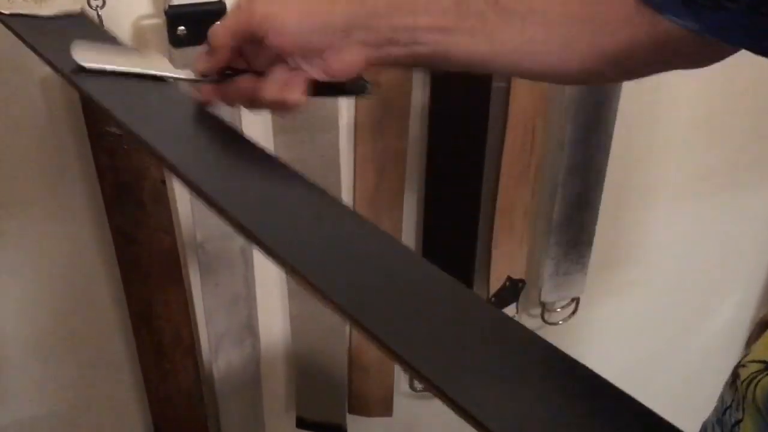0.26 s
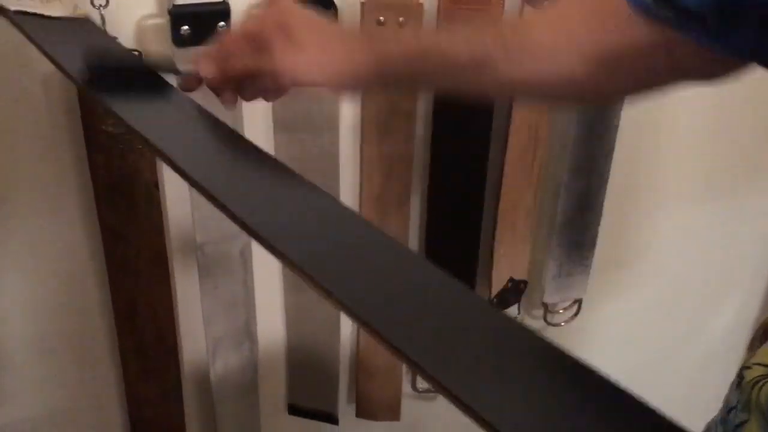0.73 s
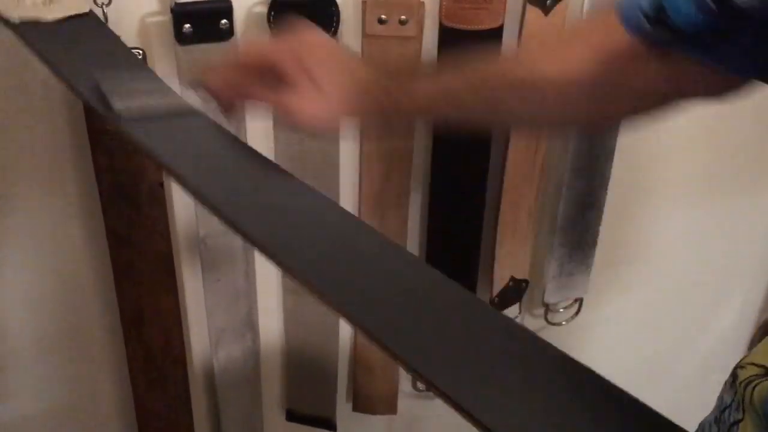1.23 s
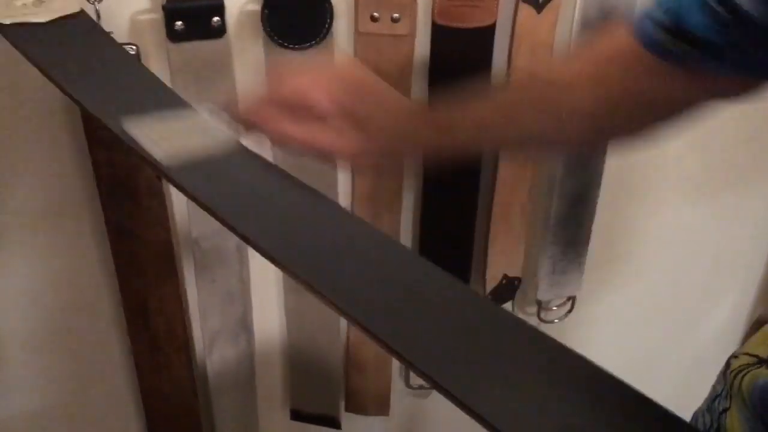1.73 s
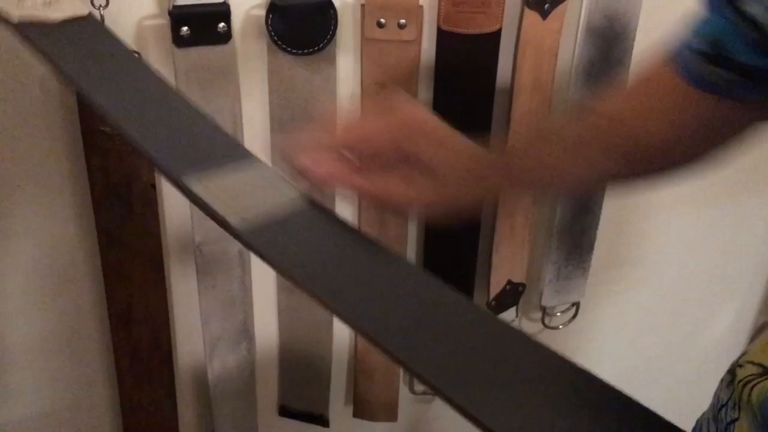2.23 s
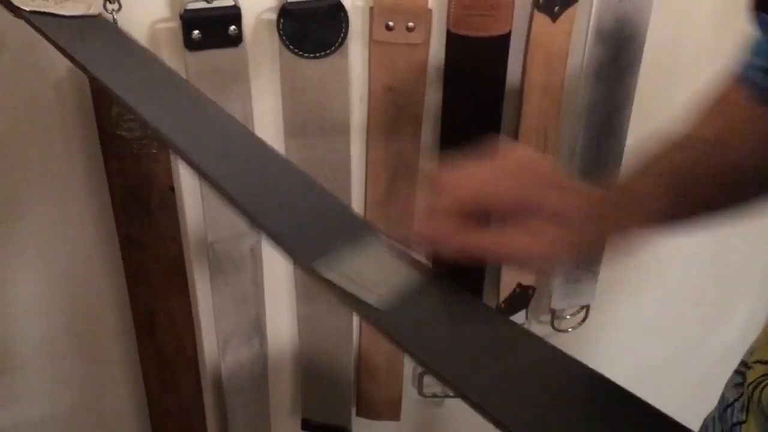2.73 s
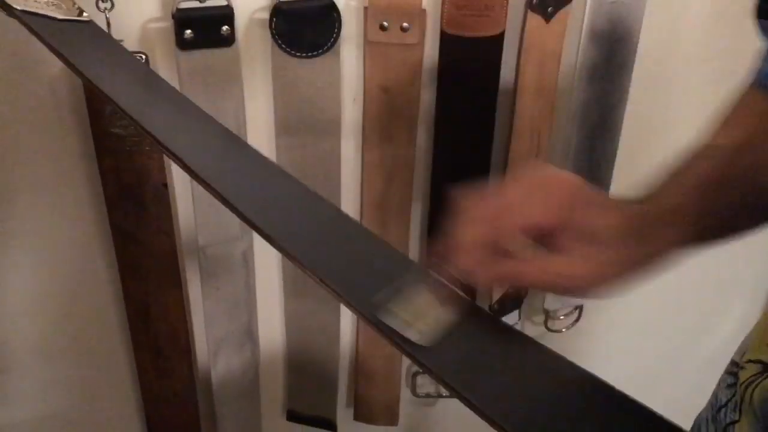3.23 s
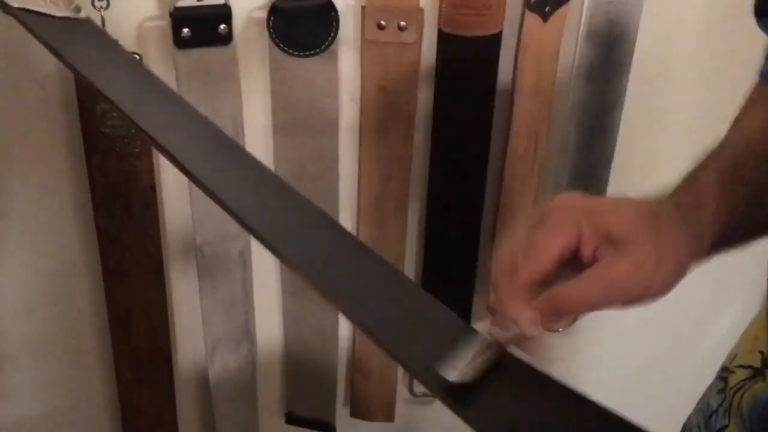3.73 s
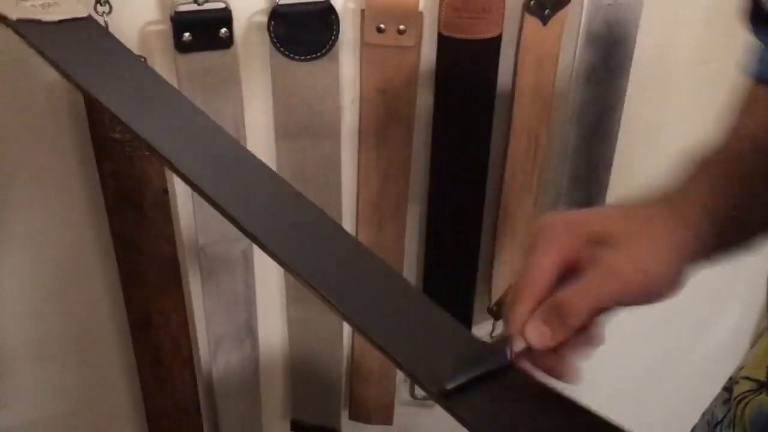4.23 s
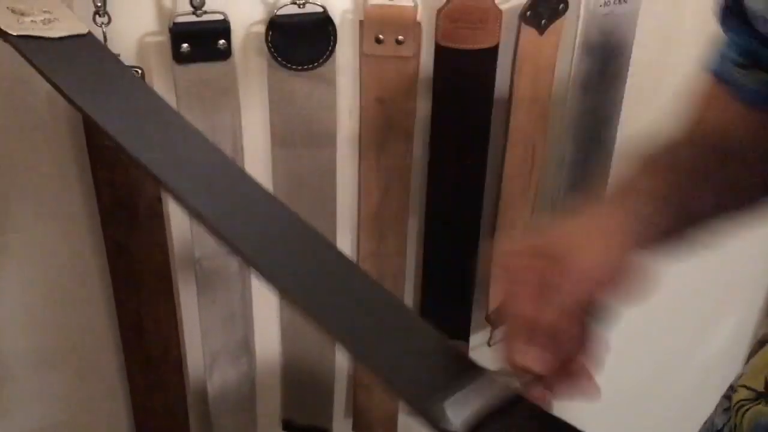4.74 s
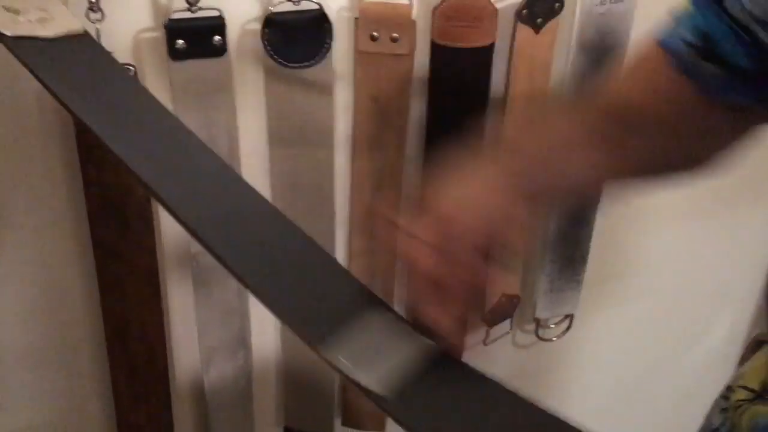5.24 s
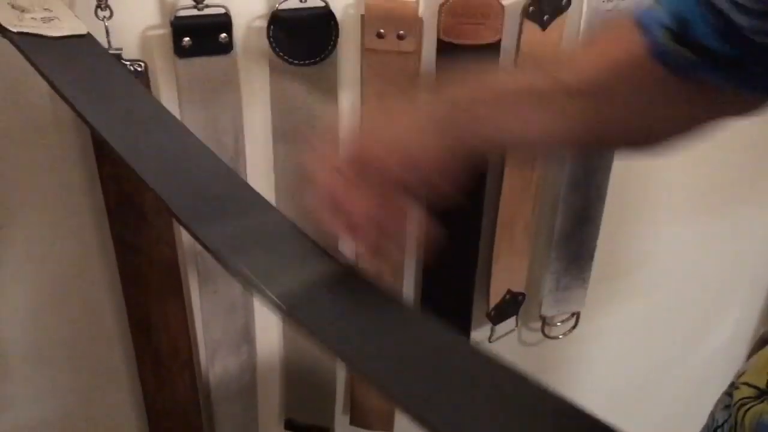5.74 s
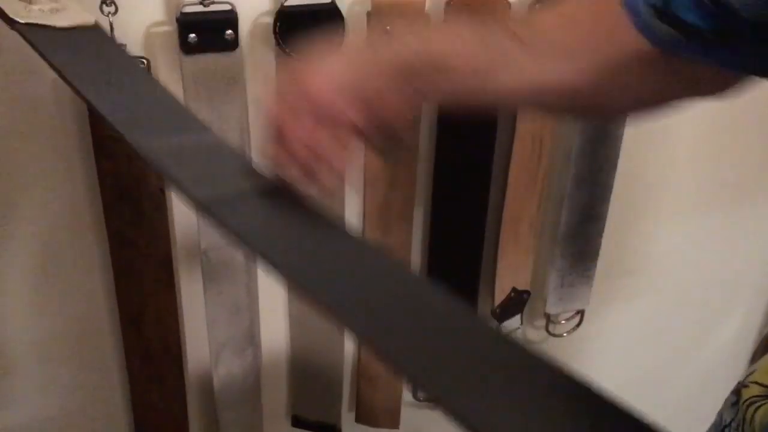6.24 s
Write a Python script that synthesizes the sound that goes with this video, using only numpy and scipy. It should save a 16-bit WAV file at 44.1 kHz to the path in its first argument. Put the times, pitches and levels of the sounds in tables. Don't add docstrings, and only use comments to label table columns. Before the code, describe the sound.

A thin steel blade rubs leather in steady alternating strokes without stopping: touch, airy high hiss, crisp braking scrape, quick flip, then back again. Some return strokes rasp more roughly. Light clicks mark a few landings, the strap softly thuds twice, and the freed blade pings faintly. One close microphone hears it dry, with little room echo, above a quiet, low ventilation drone.

```python
import sys
import numpy as np
from scipy import signal
from scipy.fft import rfft, irfft
from scipy.io import wavfile
from scipy.ndimage import uniform_filter1d, map_coordinates

SR = 44100
rng = np.random.default_rng(int(sys.argv[2]) if len(sys.argv) > 2 else 0)


def int16_out(signal):
    q = np.round(np.clip(np.atleast_2d(signal).T, -1, 1) * 32767)
    wavfile.write(sys.argv[1], SR, q.astype(np.int16))


def invert_db(x):
    u = np.asarray(x, float) / 20
    return 10 ** u


N = 285768


def stropping():
    drive = slips(per_s=16000, spread_db=2.2, clump_db=.9, patchy_db=1.4, streak_db=2.1)
    return blade_and_leather(drive) + edge_sizzle(drive) + rough_grain(drive)


def slips(per_s, spread_db, clump_db, patchy_db, streak_db):
    sign = rng.choice([-1., 1.], N)
    size = sign * invert_db(spread_db * np.minimum(rng.exponential(1, N), 3.6))
    happens = rng.random(N) < per_s / SR
    train = size * happens * invert_db(clump_db * wander(260))
    z = signal.stft(train, nperseg=512, noverlap=384)[2]
    a, b = rng.standard_normal((z.shape[1], z.shape[0], 2)).T
    patches = uniform_filter1d(uniform_filter1d(a, size=9, axis=0), size=9, axis=1)
    streaks = uniform_filter1d(uniform_filter1d(b, size=2, axis=0), size=12, axis=1)
    less_up_high = np.linspace(1.9, .4, len(z))[:, None]
    z = z * invert_db(patchy_db * evened(patches) * less_up_high + streak_db * evened(streaks))
    return signal.istft(z, nperseg=512, noverlap=384)[1][:N]


# touch_s, settling_s, lift_s, landing_db, braking_db
AWAY = [(0.078, 0.015, 0.252, -42.4, -34.6), (0.61, 0.004, 0.776, -44.4, -37.0),
        (1.187, -0.001, 1.313, -47.3, -34.2), (1.672, 0.027, 1.841, -44.2, -34.3),
        (2.234, 0.006, 2.375, -43.9, -33.7), (2.757, 0.016, 2.925, -44.6, -34.7),
        (3.301, 0.016, 3.467, -49.6, -34.4), (3.835, 0.016, 3.998, -44.1, -35.3),
        (4.393, 0.005, 4.526, -44.1, -33.1), (4.904, 0.014, 5.067, -45.1, -32.1),
        (5.437, 0.04, 5.614, -45.0, -34.4), (5.98, 0.011, 6.143, -46.4, -35.8)]
# touch_s, settling_s, lift_s, landing_db, braking_db
BACK = [(-0.15, 0.01, -0.006, -43.0, -35.2), (0.371, 0.018, 0.53, -44.1, -37.6),
        (0.92, 0.011, 1.063, -38.0, -40.1), (1.443, 0.016, 1.604, -42.2, -38.4),
        (2.006, 0.007, 2.126, -41.5, -38.6), (2.521, 0.017, 2.671, -38.3, -39.4),
        (3.039, 0.021, 3.221, -46.0, -39.8), (3.598, 0.013, 3.754, -39.6, -39.4),
        (4.143, 0.007, 4.277, -41.6, -38.4), (4.658, 0.02, 4.815, -41.6, -36.8),
        (5.21, 0.011, 5.36, -40.8, -38.7), (5.751, 0.008, 5.897, -41.9, -37.5),
        (6.284, 0.009, 6.431, -39.8, -40.0)]
# bite_s, fastest_s, slackens_s, speed_db, speed_left_db
AWAY_EDGE = [(0.132, 0.173, 0.225, -27.4, -25.9), (0.646, 0.706, 0.748, -24.7, -35.3),
             (1.201, 1.22, 1.283, -23.5, -30.1), (1.727, 1.762, 1.803, -23.1, -29.0),
             (2.278, 2.308, 2.343, -24.0, -31.4), (2.831, 2.843, 2.898, -23.7, -28.7),
             (3.343, 3.385, 3.439, -24.8, -30.5), (3.898, 3.919, 3.968, -20.8, -27.0),
             (4.431, 4.458, 4.496, -19.0, -28.2), (4.964, 4.988, 5.031, -17.5, -27.5),
             (5.51, 5.54, 5.571, -23.1, -26.6), (6.031, 6.058, 6.101, -20.2, -25.1)]
# bite_s, fastest_s, slackens_s, speed_db, speed_left_db
BACK_EDGE = [(-0.12, -0.09, -0.05, -24.0, -30.1), (0.425, 0.427, 0.482, -24.2, -25.4),
             (0.964, 0.976, 1.033, -19.3, -35.9), (1.493, 1.517, 1.557, -22.1, -27.9),
             (2.036, 2.063, 2.082, -23.2, -26.8), (2.579, 2.595, 2.625, -25.9, -26.3),
             (3.111, 3.123, 3.176, -18.6, -31.5), (3.653, 3.718, 3.725, -23.9, -32.3),
             (4.178, 4.194, 4.238, -24.2, -26.3), (4.711, 4.729, 4.778, -20.4, -25.4),
             (5.265, 5.286, 5.326, -20.1, -28.3), (5.793, 5.811, 5.86, -19.3, -32.8),
             (6.329, 6.357, 6.39, -27.1, -23.5)]
# upper_blade_db, lower_blade_db, leather_db
AWAY_VOICE = dict(touch=(-35, -23, -4), land=(1.5, -.2, .9), fast=(-33.3, -40, -46.6),
              slack=(-35.2, -42.5, -47.5), brake=(-7.4, -.7, -7.6), leave=(-7.7, -4.8, -9.4),
              gone=(-66.7, -67.5, -55.7))
# upper_blade_db, lower_blade_db, leather_db
BACK_VOICE = dict(touch=(-13.2, -15.9, -7.5), land=(.2, 1.3, -1.4), fast=(-33.6, -38.4, -47.7),
              slack=(-33.4, -39.7, -44), brake=(-5.1, -1.8, -1.2), leave=(-16.8, -12.5, -10.4),
              gone=(-71.4, -64.2, -65.1))
# start_s, length_s, level_db
GRAZE = (2.205, .027, -47)
# pitch_hz, level_db (per Hz)
BLADE_HIGH = [(6500, -38), (7700, -8), (8600, -3), (9600, 0), (10500, -6), (12000, -43)]
# pitch_hz, level_db (per Hz)
BLADE_LOW = [(4000, -72), (4900, -12), (5600, -4), (6000, 1), (7200, 2.5), (7700, -8), (9000, -32)]
# pitch_hz, level_db (per Hz)
LEATHER = [(600, -16), (1300, -10), (1900, -9), (2400, -1.5), (2800, -2), (3200, 1), (3700, -2), (4300, -1),
           (4900, -3.5), (6000, -17.5)]
# pitch_hz, level_db (per Hz)
SIZZLE = [(9000, -30), (10300, 1), (11400, 11.5), (13000, 11.5), (15000, 11.5), (17500, 6.5)]


def blade_and_leather(drive):
    high = coloured(drive, BLADE_HIGH) + invert_db(-2.5) * coloured(drive, SIZZLE)
    low, leather = coloured(drive, BLADE_LOW), coloured(drive, LEATHER)
    start, length, db = GRAZE
    touches = [[(start, db - 14, db - 11, db + 2.5),
                (start + .4 * length, db - 5, db - 5.5, db + 2.5),
                (start + length, db - 13, db - 7, db - 6)]]
    for strokes, edges, voice in ((AWAY, AWAY_EDGE, AWAY_VOICE), (BACK, BACK_EDGE, BACK_VOICE)):
        touches += [stages(stroke, edge, voice) for stroke, edge in zip(strokes, edges)]
    out = np.zeros(N)
    for rows in touches:
        now, gains = contact(rows, rise_s=0.0042, fade_db_per_s=500)
        gains[2] = uniform_filter1d(gains[2], size=500, mode="constant")
        for gain, sound in zip(gains, (high, low, leather)):
            out[now] += gain * sound[now]
    return out


# upper_blade, lower_blade, leather (dB per dB)
FOLLOW = (.13, .28, .19)


def stages(stroke, edge, voice):
    usual_speed_db, usual_left_db = -23, -29
    leave_s, release_s = .012, .043
    touch, settle, lift, land_db, brake_db = stroke
    fast, slack, speed_db, left_db = edge[1:]
    control = dict(touch=land_db, land=land_db,
                   fast=np.multiply(FOLLOW, speed_db - usual_speed_db),
                   slack=np.multiply(FOLLOW, left_db - usual_left_db),
                   brake=brake_db, leave=brake_db, gone=0)
    times = (touch, touch + abs(settle), fast, slack, lift, lift + leave_s, lift + release_s)
    return [(s, *np.add(voice[name], control[name])) for s, name in zip(times, voice)]


# approach_s, approach_db, bite_db, dying_db_per_s
AWAY_BITE = (.015, -42.4, -27.2, 775)
# approach_s, approach_db, bite_db, dying_db_per_s
BACK_BITE = (.028, -40.1, -24.8, 750)


def edge_sizzle(drive):
    sizzle = coloured(drive, SIZZLE)
    dying_s = .04
    out = np.zeros(N)
    for edges, rule in ((AWAY_EDGE, AWAY_BITE), (BACK_EDGE, BACK_BITE)):
        approach_s, approach_db, bite_db, dying_db_per_s = rule
        for bite, fast, slack, speed_db, left_db in edges:
            rows = [(bite - approach_s, approach_db), (bite, bite_db), (fast, speed_db), (slack, left_db),
                    (slack + dying_s, left_db - dying_db_per_s * dying_s)]
            now, gains = contact(rows, rise_s=0.0036, fade_db_per_s=900)
            out[now] += gains[0] * sizzle[now]
    return out


# start_s, level_db, length_s
BITES = [(0.41, -20, .04), (0.965, -20, 0.031), (2.03, -20, .035), (3.099, -18, 0.036), (4.178, -17, .025),
         (4.716, -16, 0.024), (5.258, -21, 0.043), (5.79, -18, 0.031)]
# pitch_hz, level_db (per Hz)
RASP = [(5300, -60), (5900, -8), (7300, -1), (8000, -21), (11500, -23), (13500, -5), (15000, 10),
        (17500, 4)]


def rough_grain(drive):
    rasp = coloured(drive, RASP)
    out = np.zeros(N)
    for start, db, length in BITES:
        now, gains = contact([(start, db), (start + length, db - 6.0)], rise_s=0.007, fade_db_per_s=2500)
        out[now] += gains[0] * rasp[now]
    return out


def contact(rows, rise_s, fade_db_per_s):
    s, *levels_db = np.transpose(rows)
    now = slice(max(int(s[0] * SR), 0), int(s[-1] * SR) + 2000)
    t = np.arange(N)[now] / SR
    rise = np.clip((t - s[0]) / rise_s, 0, 1)
    ramp = rise * invert_db(-fade_db_per_s * np.maximum(t - s[-1], 0))
    return now, [ramp * invert_db(np.interp(t, s, db)) for db in levels_db]


# start_s, peak_db, knock_hz, tick_db (steel against the knock)
LANDINGS = [
    (1.1875, -27, 2150, -10),
    (1.4002, -36.5, 1340, -25),
    (2.0187, -30, 2160, 0),
    (3.328, -38, 1500, 8),
    (4.153, -29.5, 2000, -4),
    (5.763, -35, 2460, 0),
]


def landings():
    out, t = np.zeros(N + 6000), np.arange(6000) / SR
    for start, db, hz, tick_db in LANDINGS:
        knock = np.sin(2 * np.pi * hz * t) * t / 0.00076 * np.exp(1 - t / 0.00042)
        knock += invert_db(-2) * np.roll(knock, round(0.0031 * SR))
        tick = invert_db(tick_db) * rng.standard_normal(6000) * invert_db(-60 * t / 0.0065)
        out[round(start * SR):][:6000] += invert_db(db) * (knock + tick)
    return out[:N]


# start_s, peak_db, pitch_hz, fade_s (to -60 dB)
RINGS = [
    (3.196, -40, 9950, .09),
    (3.203, -41, 8850, .12),
    (3.222, -45, 2500, .11),
    (6.126, -42, 3130, .05),
    (1.07, -46, 9000, .06),
    (.325, -46, 9300, .015),
]


def blade_rings():
    out, t = np.zeros(N + 6000), np.arange(6000) / SR
    for start, db, hz, fade_s in RINGS:
        ring = invert_db(db - 60 * t / fade_s) * np.sin(2 * np.pi * hz * t)
        out[round(start * SR):][:6000] += ring * np.minimum(t / 0.0029, 1)
    return out[:N]


# start_s, peak_db, pitch_hz
THUMPS = [
    (.348, -28, 138),
    (3.636, -26.5, 85.5),
]


def hook_tugs():
    out, t = np.zeros(N + 6000), np.arange(6000) / SR
    for start, db, hz in THUMPS:
        out[round(start * SR):][:6000] += invert_db(db) * np.sin(2 * np.pi * hz * t) * t / .007 * np.exp(1 - t / .007)
    return out[:N]


# middle_s, rustle_db
FLIPS = [(.07, -60), (.36, -60), (.59, -63), (.9, -64), (1.16, -67), (1.42, -64), (1.66, -62), (1.99, -58),
         (2.19, -55), (2.48, -59), (2.75, -61), (3.02, -61), (3.29, -64), (3.57, -70), (3.83, -57),
         (4.12, -64), (4.38, -65), (4.64, -65), (4.89, -55), (5.19, -64), (5.44, -58), (5.73, -62),
         (5.97, -57), (6.26, -56)]


def rustle():
    t = np.arange(N) / SR
    swell = sum(invert_db(db) * np.exp(-((t - middle) / 0.022) ** 2) for middle, db in FLIPS)
    flexing = resonate(rng.standard_normal(N), hz=2170, width=1740)
    return invert_db(1.9 * wander(30)) * swell * flexing


# pitch_hz, fade_s (to -60 dB)
ROOM = [(1000, 0.66), (2500, 0.13), (5000, 0.22), (10000, 0.16), (16000, 0.11)]


def room(x):
    taps = np.zeros(SR // 2)
    at = np.arange(200, len(taps) - 20, 20)
    taps[at + rng.integers(0, 20, len(at))] = rng.choice([-1., 1.], len(at))
    hz, t, z = signal.stft(taps, SR, nperseg=256)
    fade = invert_db(-60 * t / read(ROOM, hz)[:, None])
    tail = signal.istft(z * fade, SR, nperseg=256)[1]
    return signal.fftconvolve(x, tail / np.linalg.norm(tail))[:N]


# pitch_hz, level_db (per Hz)
AIR = [(22, -24), (55, 4), (128, 0.5), (200, -5), (300, -8), (420, -12.5), (790, -18), (1200, -15),
       (1500, -19.5), (2000, -24), (2700, -20.5), (3700, -29), (6200, -27.5), (17500, -31)]
# pitch_hz, width_hz, level_db
DRONE = [(50.8, 17, -47.5), (74.4, 12.4, -49), (92.3, 7.3, -57.5), (142.5, 22, -50.5), (170.8, 23, -58.5),
         (243.4, 12, -55), (271.6, 13, -58.5), (338.7, 13, -62), (380.2, 26, -63.5), (470.8, 14, -65.5),
         (536.5, 2.6, -67.5), (602, 8, -71.5), (662, 18, -66.5), (727.4, 14, -70.5), (889, 38, -67.5),
         (1001.5, 60, -63)]
# pitch_hz, level_db
HUM = [(120, -53), (294, -53.5), (1175, -61.5), (4250, -75), (5250, -72)]


def fan():
    out = invert_db(-45.5) * coloured(rng.standard_normal(N), AIR)
    for hz, width, db in DRONE:
        out += invert_db(db) * resonate(rng.standard_normal(N), hz, width)
    for hz, db in HUM:
        turns = np.cumsum(hz * (1 + 0.000825 * wander(2.5))) / SR
        out += np.sqrt(2) * invert_db(db + 0.57 * wander(6)) * np.sin(2 * np.pi * turns)
    return out


def evened(x):
    return x / np.sqrt(np.mean(x ** 2) + 1e-20)


def read(points, hz):
    f, value = np.transpose(points)
    return np.interp(np.log(hz + 1), np.log(f + 1), value)


def coloured(x, spectrum):
    gain = invert_db(read(spectrum, np.fft.rfftfreq(len(x), 1 / SR)))
    return evened(irfft(rfft(x) * gain, len(x)))


def resonate(x, hz, width):
    r = np.exp(-np.pi * width / SR)
    poles = [1, -2 * r * np.cos(2 * np.pi * hz / SR), r * r]
    once = evened(signal.lfilter([1, 0, -1], poles, x))
    return evened(signal.lfilter([1], poles, once))


def wander(per_s):
    knots = rng.standard_normal(4000)
    return evened(map_coordinates(knots, [np.arange(N) / SR * per_s % 3990], order=3))


def scene():
    razor = stropping() + landings() + blade_rings() + hook_tugs() + rustle()
    return np.tile(razor + invert_db(-17) * room(razor) + fan(), (2, 1))


def top_cut(x):
    return signal.sosfilt(signal.butter(12, 17010, fs=SR, output="sos"), x)


# pitch_hz, width_hz, level_db
MIC_DIPS = [(3450, 67, -0.5), (4830, 140, -4), (7560, 750, -4), (10400, 290, -4.5)]


def record(dry):
    hz = np.fft.rfftfreq(N, 1 / SR)
    dips_db = sum(db * np.exp(-((hz - f) / width) ** 2) for f, width, db in MIC_DIPS)
    heard = irfft(rfft(dry) * invert_db(dips_db), N)
    heard = signal.sosfilt(signal.butter(N=3, Wn=29, btype="high", fs=SR, output="sos"), heard)
    treble_end = signal.firwin(2047, 15850, window=("kaiser", 9), fs=SR)
    heard = signal.oaconvolve(heard, treble_end[None], "same")
    return top_cut(heard)


dry = scene()
out = record(dry)
int16_out(out)
```